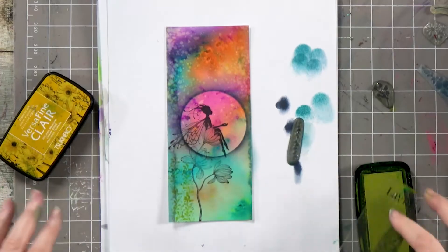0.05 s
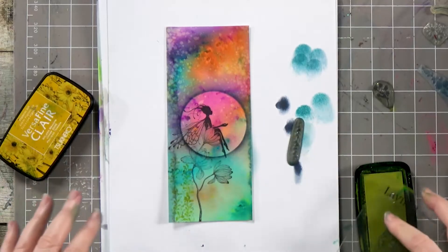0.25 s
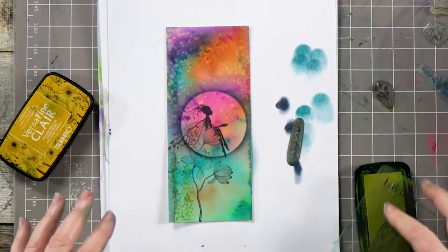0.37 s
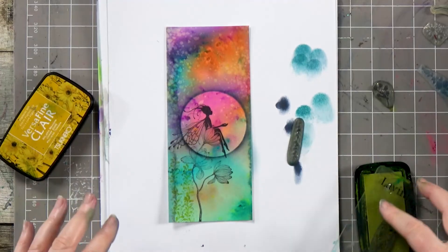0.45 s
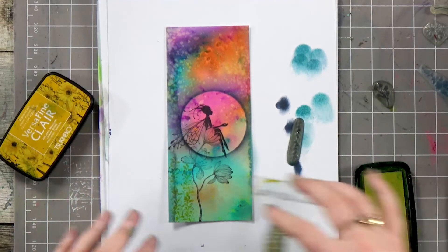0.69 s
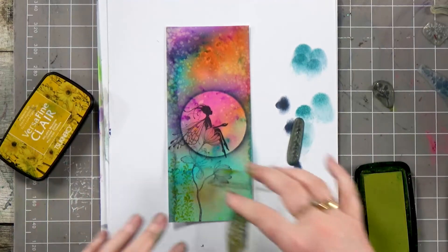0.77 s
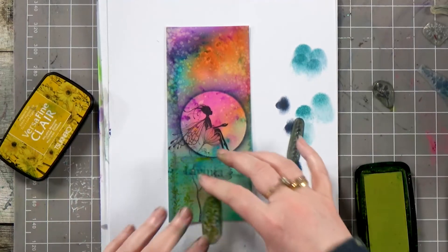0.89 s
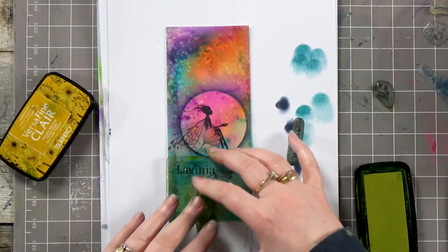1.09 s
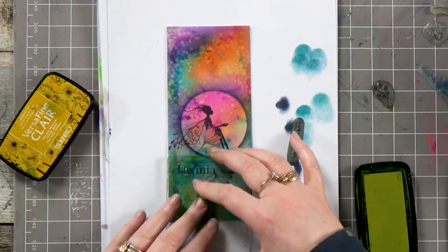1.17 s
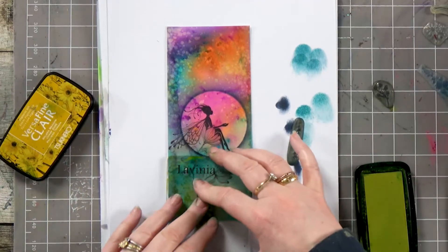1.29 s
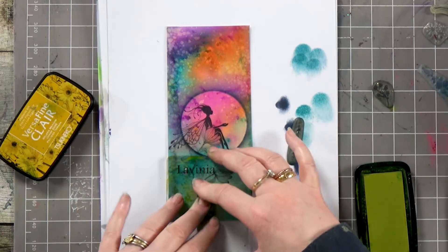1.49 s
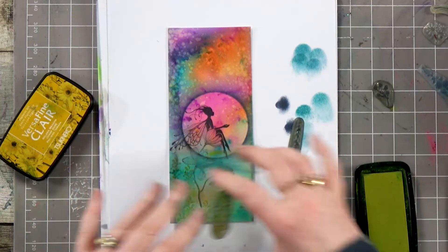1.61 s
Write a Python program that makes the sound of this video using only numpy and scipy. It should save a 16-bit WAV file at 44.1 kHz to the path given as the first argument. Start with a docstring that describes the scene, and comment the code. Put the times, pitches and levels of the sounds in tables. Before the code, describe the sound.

A plastic stamp block knocks an ink pad in rapid succession, one sharp clack and two duller thumps, with short room echoes; much later a barely audible sticky tick over low fan hum and hiss, miked close in stereo.

```python
"""Stamp knocks on an ink pad

An acrylic stamp block is knocked three times on an ink pad lying on a work table, in a small room.
Each knock is a filtered-noise plastic tick with a hollow thump of decaying pad and table modes.
Echoes flutter between table and ceiling, and a diffuse noise tail answers.
Later sparse noise impulses give one faint sticky crackle; a fan-like murmur and hiss lie under all."""
import sys
import numpy as np
from scipy import signal
from scipy.fft import rfft, irfft, next_fast_len
from scipy.io import wavfile

SR = 44100
rng = np.random.default_rng(int(sys.argv[2]) if len(sys.argv) > 2 else 0)


def file_out(sig):
    """Save sig as 16-bit WAV at sys.argv[1]."""
    # one column per channel
    cols = np.atleast_2d(sig).T
    # limit, then scale
    lim = np.clip(cols, -1, 1)
    pcm = np.round(lim * 32767).astype(np.int16)
    wavfile.write(sys.argv[1], SR, pcm)


N = 72765  # length in samples


def amp(db):
    """Level law: decibels to amplitude gain."""
    return 10 ** (np.asarray(db) / 20)


def unit(x):
    """Normalisation: scale to rms 1."""
    return x / np.sqrt(np.mean(x ** 2) + 1e-20)


def along(points, hz):
    """Interpolation of (Hz, value) points on a logarithmic frequency axis."""
    point_hz, value = np.transpose(points)
    return np.interp(np.log(hz + 1), np.log(point_hz + 1), value)


def lowpass(hz, edge_hz, order):
    """Butterworth magnitude law: the gain of a smooth low-pass."""
    return 1 / np.sqrt(1 + (hz / edge_hz) ** (2 * order))


def filtered(x, response):
    """Linear filtering: the spectrum is multiplied by a response of frequency."""
    size = next_fast_len(N + SR // 2)
    spectrum = rfft(x, size) * response(np.fft.rfftfreq(size, 1 / SR))
    return irfft(spectrum, size)[..., :N]


def coloured(x, gain):
    """Minimum-phase filtering: a folded cepstrum makes the given gain causal."""
    size = 4096
    cepstrum = irfft(np.log(np.maximum(gain(np.fft.rfftfreq(size, 1 / SR)), 1e-6)))
    cepstrum[1:size // 2] *= 2
    cepstrum[size // 2 + 1:] = 0
    impulse = irfft(np.exp(rfft(cepstrum)))
    return signal.fftconvolve(x, impulse)[:N]


def delayed(x, s):
    """Propagation delay: x, later by s seconds."""
    return np.pad(x, (max(round(s * SR), 0), 0))[:N]


def pair(gain, alike):
    """Interchannel correlation: mid and side noise are mixed to a left-right likeness."""
    def mid_side_gain(hz):
        angle = np.arccos(np.clip(along(alike, hz), -1, 1)) / 2
        return gain(hz) * np.array([np.cos(angle), np.sin(angle)])

    mid, side = filtered(rng.standard_normal((2, N)), mid_side_gain)
    return np.array([mid + side, mid - side])


# The three blows. Each row: start in seconds, thump gain in dB, contact cut-off in Hz (lower is softer),
# pad pitch as a ratio, tick gain in dB, tick cut-off in Hz, left-right offset in dB.
KNOCK_ROWS = [(0.2038, .7, 1300, 1, -33, 10000, 1), (.3691, -5, 680, .93, -29, 2400, -2),
              (.5219, -1.7, 800, 0.98, -29, 5100, -.6)]
# Left-right balance of the table. Each row: frequency in Hz, left minus right in dB before the blow's offset.
TABLE_SIDES = [(110, 0), (200, 3), (370, -3), (700, .5), (1200, -2), (2400, 0.5)]


def knocks():
    """Superposition: each blow adds tick, thump and echoes; each frequency favours one side."""
    out = np.zeros((2, N))
    for start_s, thump_db, soft_hz, pitch, tick_db, edge_hz, pan_db in KNOCK_ROWS:
        source = amp(tick_db) * tick(edge_hz) + amp(thump_db) * thump(soft_hz, pitch)
        blow = delayed(source, start_s)
        heard = blow + flutter(blow, count=4) + room(blow)
        out += filtered(heard, lambda hz: amp(np.outer([.5, -.5], pan_db + along(TABLE_SIDES, hz))))
    return out


# Modes of the work table. Each row: frequency in Hz, relative level in dB, decay time T60 in seconds.
TABLE_MODES = [(29.1, -57, 0.74), (68, -53, .08), (110, -48.5, .5), (128, -47, .3), (212, -48, 0.18),
               (310, -45, 0.034), (398, -42.5, .3)]
# Modes of ink pad and case. Each row: frequency in Hz at pitch 1, relative level in dB, T60 in seconds.
PAD_MODES = [(460, -26.5, .045), (565, -30, .045), (680, -29.5, 0.043), (743.8, -34, .09),
             (775, -21, 0.054), (978, -33, 0.039), (1081, -35.5, 0.044), (1163, -36.5, 0.048),
             (1750, -49, .05)]
BEND_LAG_S, BEND_REF_HZ = 0.00549, 99.7  # bending-wave delay at the reference frequency
CONTACT_ORDER = 2.06


def thump(soft_hz, pitch):
    """Modal excitation and dispersion: soft contact weakens upper modes, low bending waves arrive late."""
    t = np.arange(N) / SR
    modes = TABLE_MODES + [(pitch * hz, db, t60) for hz, db, t60 in PAD_MODES]
    ring = np.zeros(N)
    for hz, db, t60 in modes:
        strike_db = db + rng.normal(0, 1)  # modes vary from blow to blow
        ring += amp(strike_db - 60 * t / t60) * np.sin(2 * np.pi * hz * t)
    struck = coloured(ring, lambda hz: lowpass(hz, soft_hz, CONTACT_ORDER))
    # This phase makes the delay fall as one over the root of frequency.
    return filtered(struck, lambda hz: np.exp(-2j * np.pi * 2 * BEND_LAG_S * np.sqrt(hz * BEND_REF_HZ)))


# Spectrum of the crack. Each row: frequency in Hz, relative level in dB.
CRACK_COLOUR = [(300, -30.5), (1050, 4.5), (1700, 0), (2500, -7), (3200, -10), (4300, -2), (5200, -8),
                (6300, -5.5), (8000, -9), (15000, -12)]
# Spectrum of the chatter. Each row: frequency in Hz, relative level in dB.
CHATTER_COLOUR = [(300, -22), (1100, 1), (1600, -0.5), (2350, 6), (3200, -3), (4400, -1), (6300, -2),
                  (8000, -7), (15000, -11)]
CRACK_T60_S, CHATTER_T60_S, CHATTER_DB = .009, .07, -15


def tick(edge_hz):
    """Impact noise: acrylic meets the plastic case in a decaying crack and a brief chatter."""
    t = np.arange(N) / SR

    def burst(colour, t60):
        noise = 2 * rng.standard_normal(N) * amp(-60 * t / t60)
        return coloured(noise, lambda hz: amp(along(colour, hz)) * lowpass(hz, edge_hz, 2.23))

    return burst(CRACK_COLOUR, CRACK_T60_S) + amp(CHATTER_DB) * burst(CHATTER_COLOUR, CHATTER_T60_S)


FLUTTER_S, FLUTTER_HZ = .0102, 1310  # echo spacing; low-pass edge of every echo
FLUTTER_DB, FLUTTER_LOSS_DB = -9, 8.5  # first echo; further loss per echo
WALL_S, WALL_DB = .0285, -14  # one nearer wall answers on its own


def flutter(x, count):
    """Repeated reflection: echoes go to and fro between table and ceiling, and one comes off a wall."""
    dull = coloured(x, lambda hz: lowpass(hz, FLUTTER_HZ, 1))
    ceiling = np.zeros(N)
    for k in range(count):
        ceiling += amp(FLUTTER_DB - FLUTTER_LOSS_DB * k) * delayed(dull, (k + 1) * FLUTTER_S)
    return ceiling + amp(WALL_DB) * delayed(dull, WALL_S)


# Reverberation time of the room. Each row: frequency in Hz, T60 in seconds.
ROOM_T60 = [(60, 0.64), (135, .85), (400, .32), (750, .21), (1200, .2), (2900, .22), (8000, .17)]
# Strength of the diffuse answer. Each row: frequency in Hz, gain in dB before the gradual onset.
ROOM_GAIN = [(50, -7.5), (125, -5), (165, -12), (220, -5), (310, -10), (500, -1.5), (750, -4), (1100, -2),
             (1500, -4), (2300, 0), (5000, -1.5), (12000, -6)]
# Likeness of the two channels of the tail. Each row: frequency in Hz, correlation (1 is identical).
ROOM_LIKENESS = [(100, 0.95), (700, 0.91), (2000, 0.89), (5000, 0.52), (12000, .2)]
ROOM_ONSET_S = 0.0084


def room(x):
    """Diffuse reverberation: convolution with noise in which each frequency dies at its own speed."""
    hz, t, noise = signal.stft(pair(np.ones_like, ROOM_LIKENESS), SR, nperseg=512)
    t60 = along(ROOM_T60, hz)[:, None]
    equal_energy = np.sqrt(2 * np.log(1000) / (t60 * SR))  # same energy for any decay time
    fade = amp(along(ROOM_GAIN, hz)[:, None] - 60 * t / t60) * equal_energy
    tail = signal.istft(noise * fade, SR, nperseg=512)[1][:, :N]
    tail = tail * (1 - np.exp(-(np.arange(N) / SR / ROOM_ONSET_S) ** 2))
    return signal.fftconvolve(x[None], tail, axes=1)[:, :N]


# Swell of the inked rubber's crackle. The row: peak time in seconds, peak level of the mid signal in dB,
# rise and fall time constants in seconds.
PEEL_SWELL = (1.627, -50.5, 0.01, .013)
# Spectrum of the snaps. Each row: frequency in Hz, relative level in dB.
SNAP_COLOUR = [(500, -25), (850, -1.5), (1500, 2), (2400, -8.5), (3600, -3.5), (3980, 5.5), (4500, -8.5),
               (5900, -2), (9000, -7.5), (15000, -19)]
SNAPS_PER_S, SNAP_SIDE_DB = 2500, -8  # mean rate before the swell; side relative to mid


def peel():
    """Stick-slip as random impulses: tiny snaps swell and fade as the rubber shifts on the card."""
    peak_s, db, rise_s, fall_s = PEEL_SWELL
    t = np.arange(N) / SR - peak_s
    snaps = rng.standard_normal((2, N)) * (rng.random((2, N)) < SNAPS_PER_S / SR)
    mid, side = [unit(coloured(row, lambda hz: amp(along(SNAP_COLOUR, hz)))) for row in snaps]
    swell = amp(db) * np.exp(-np.maximum(-t / rise_s, t / fall_s))
    return swell * (mid + amp(SNAP_SIDE_DB) * np.array([side, -side]))


# Spectrum of the fan-like murmur. Each row: frequency in Hz, relative density in dB per Hz.
MURMUR_COLOUR = [(15, -41), (25, -5.5), (54, -2), (76, -15), (108, -7.5), (198, -9), (239, -3.5), (329, -8),
                 (370, -2), (645, -9.5), (776, -4.5), (1120, -8.5), (1400, -8.5), (1820, -42), (3080, -120)]
# Spectrum of the hiss. Each row: frequency in Hz, relative density in dB per Hz.
HISS_COLOUR = [(940, -37), (1600, -1), (2500, -5), (3110, -4), (3420, -4), (10700, -4.5), (15500, -9.5)]
# Likeness of the two channels of the air noise. Each row: frequency in Hz, correlation (1 is identical).
AIR_LIKENESS = [(60, 0.8), (180, 0.61), (550, 0.84), (1650, 0.8), (4970, 0.38), (15000, 0.34)]
MURMUR_DB, HISS_DB = -61.5, -68.5  # rms levels before the final band limits
MURMUR_EDGE_HZ = 1420


def air():
    """Stationary noise: a steady low murmur, as of a fan, and microphone hiss."""
    murmur = pair(lambda hz: amp(along(MURMUR_COLOUR, hz)) * lowpass(hz, MURMUR_EDGE_HZ, 18), AIR_LIKENESS)
    # Below the murmur's edge the hiss stays flat.
    hiss = pair(lambda hz: amp(along(HISS_COLOUR, np.maximum(hz, MURMUR_EDGE_HZ))), AIR_LIKENESS)
    return amp(MURMUR_DB) * unit(murmur) + amp(HISS_DB) * unit(hiss)


def scene():
    """Superposition of knocks, crackle and room tone."""
    return knocks() + peel() + air()


LOW_CUT_HZ, TOP_HZ = 25, 15950


def record(dry):
    """Band limitation: the deepest rumble is reduced and nothing is kept from the top limit up."""
    low_cut = signal.butter(2, LOW_CUT_HZ, "highpass", fs=SR, output="sos")
    thinned = signal.sosfilt(low_cut, dry)
    return filtered(thinned, lambda hz: hz < TOP_HZ)


dry = scene()
out = record(dry)
file_out(out)
```